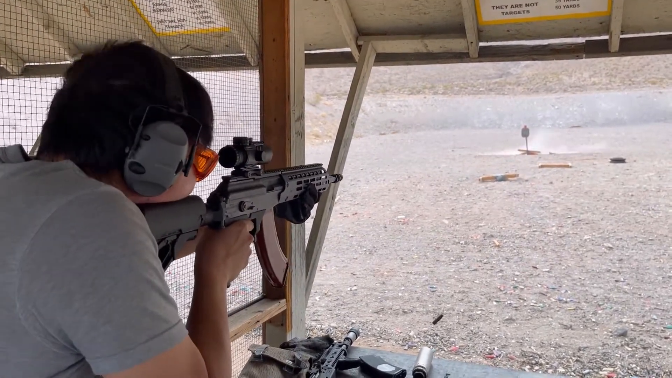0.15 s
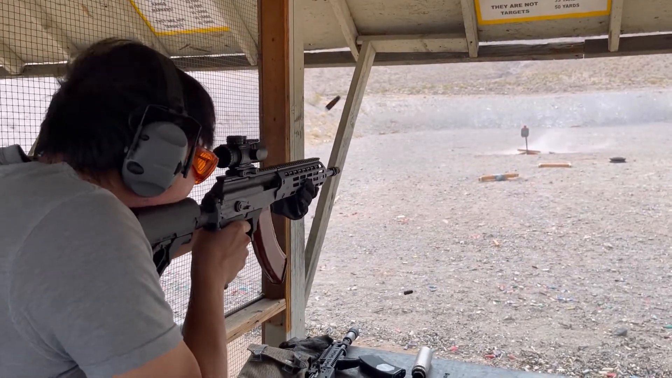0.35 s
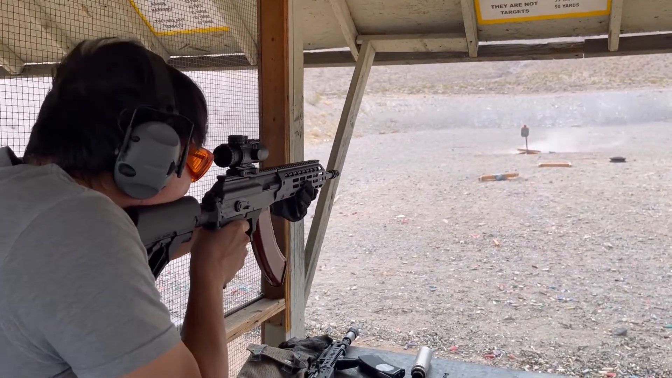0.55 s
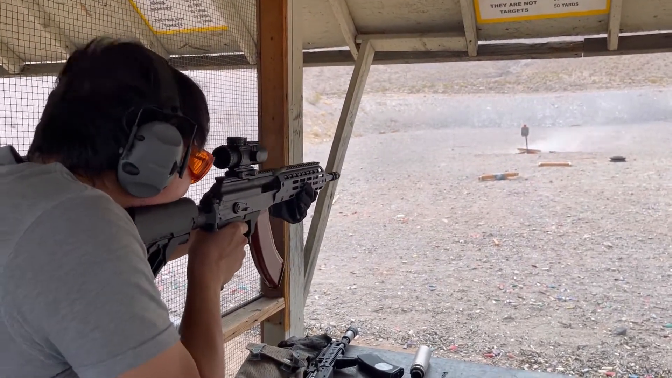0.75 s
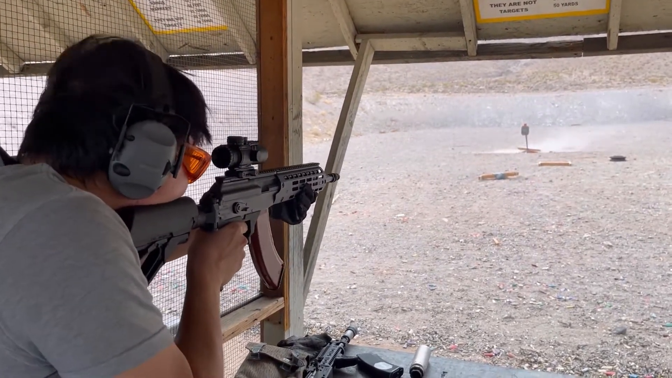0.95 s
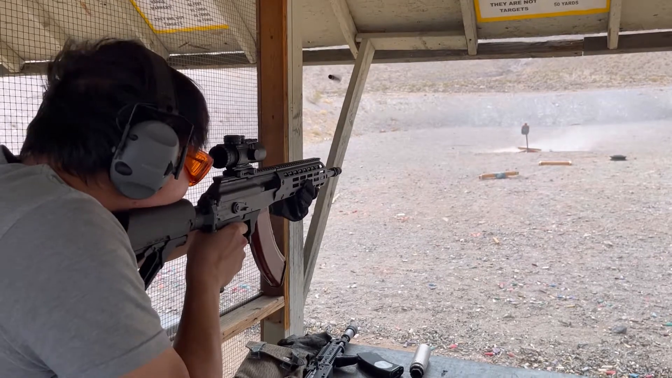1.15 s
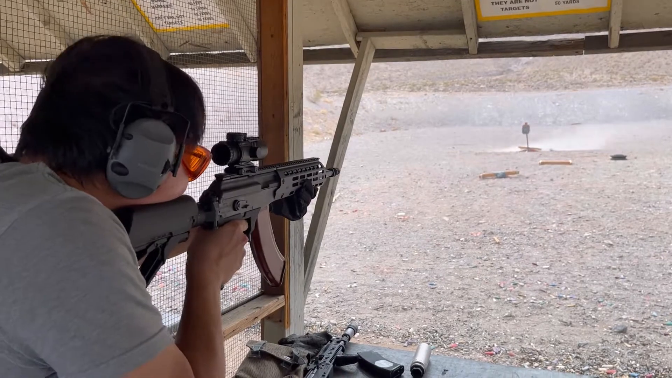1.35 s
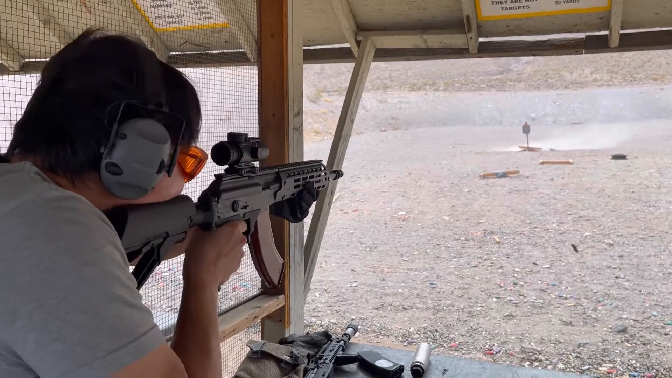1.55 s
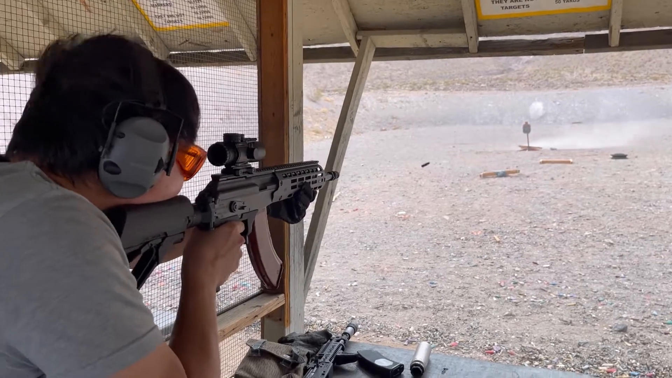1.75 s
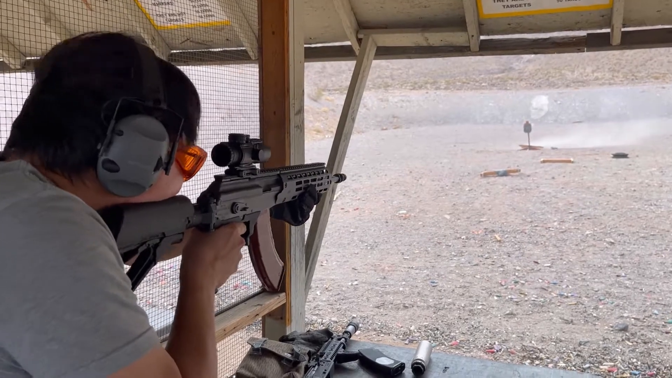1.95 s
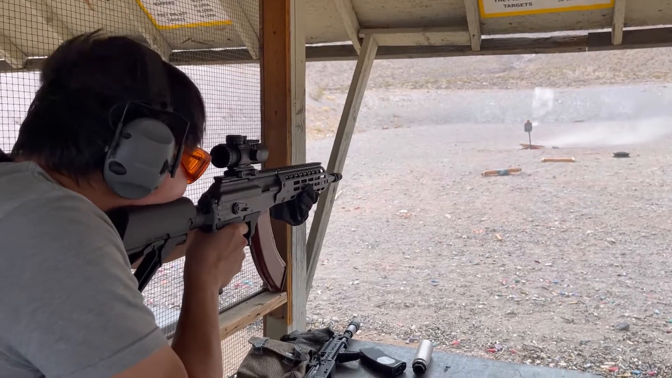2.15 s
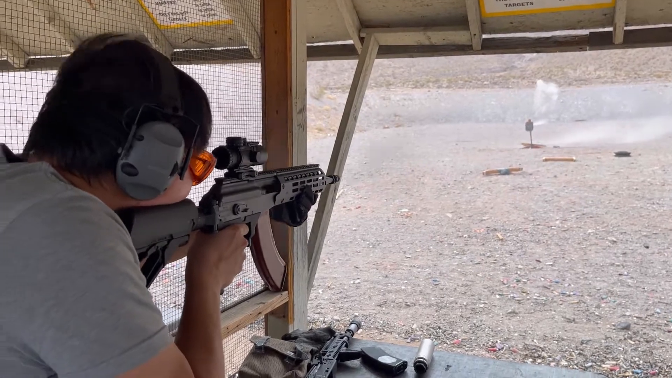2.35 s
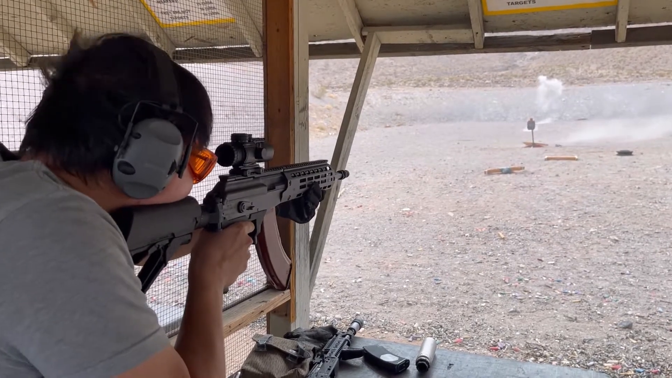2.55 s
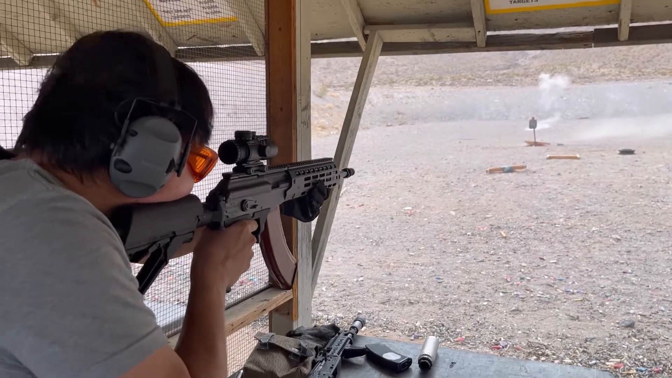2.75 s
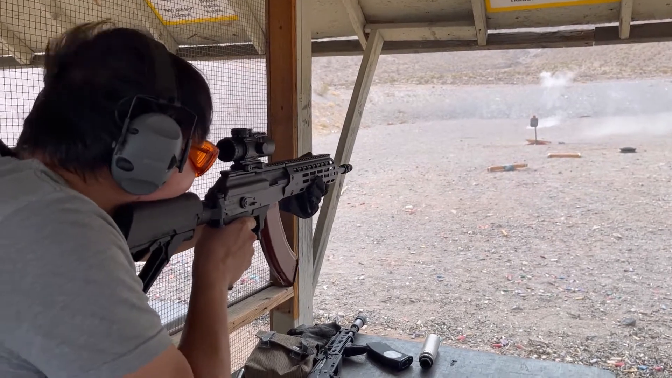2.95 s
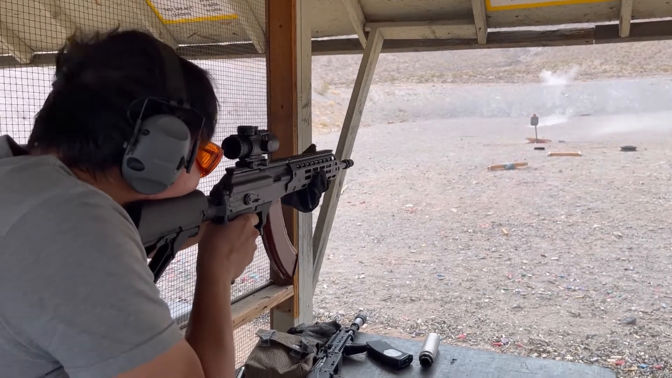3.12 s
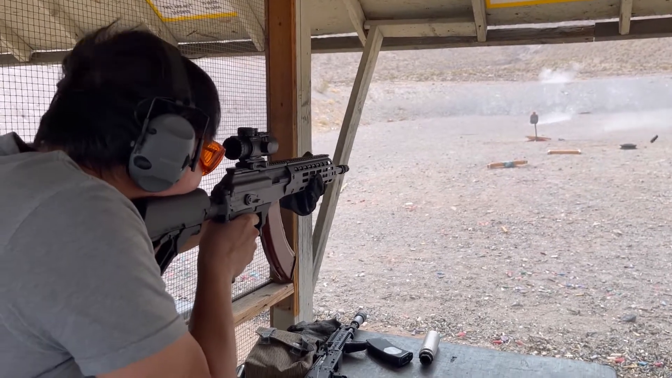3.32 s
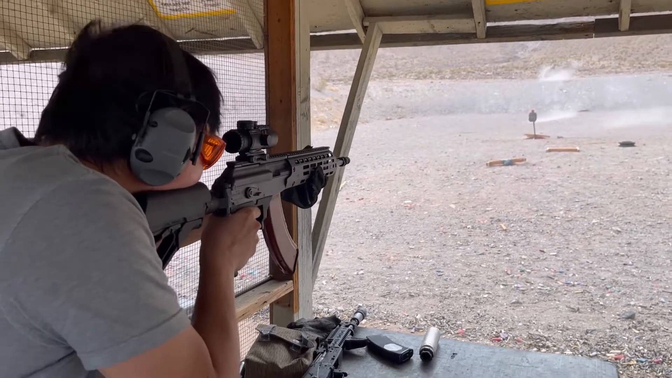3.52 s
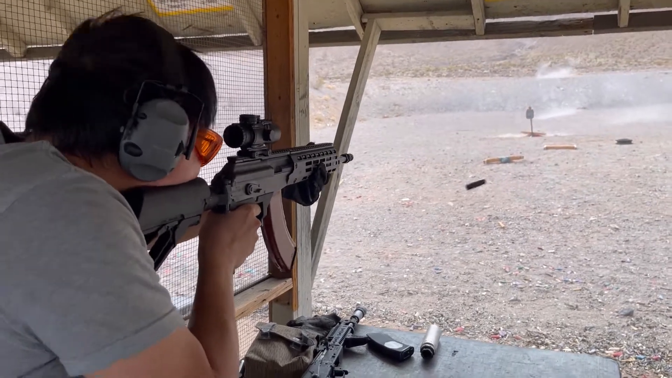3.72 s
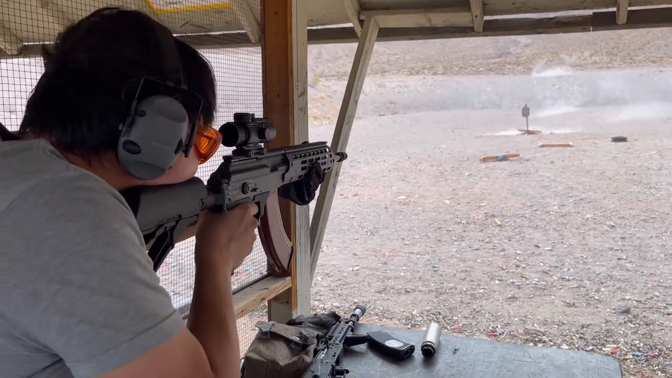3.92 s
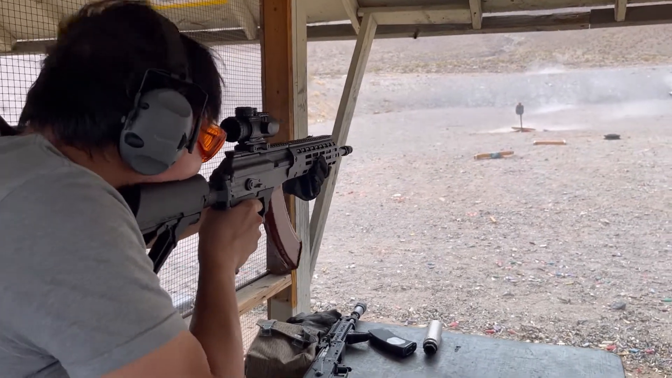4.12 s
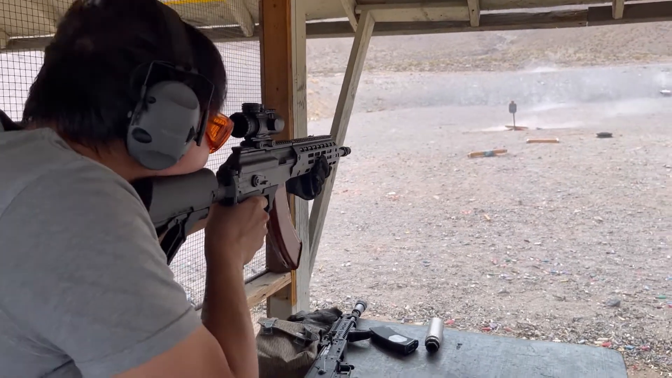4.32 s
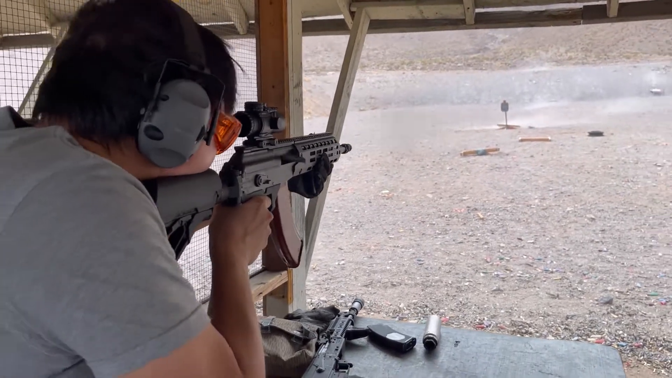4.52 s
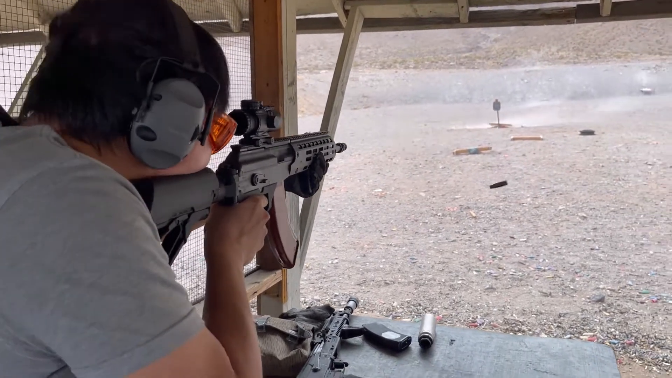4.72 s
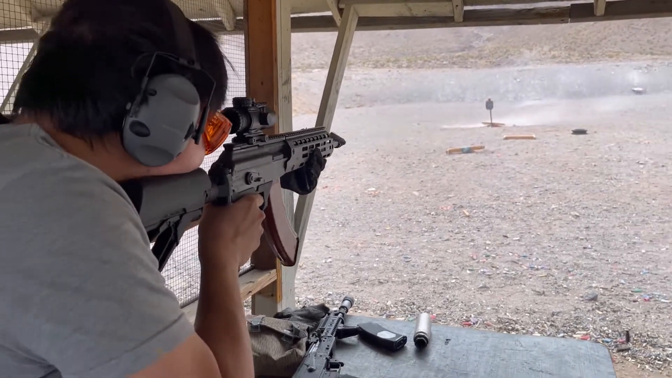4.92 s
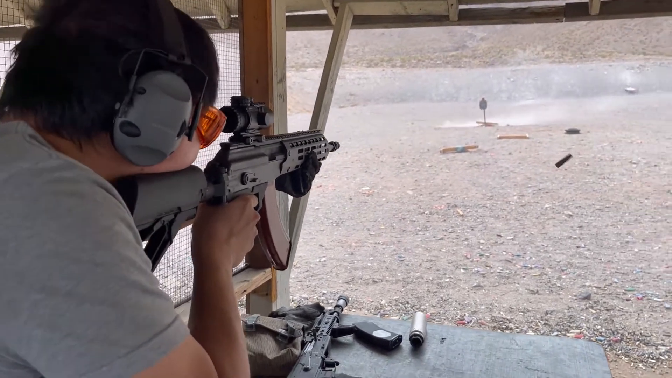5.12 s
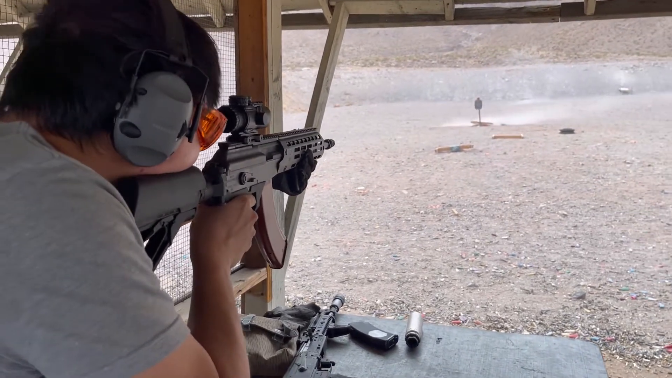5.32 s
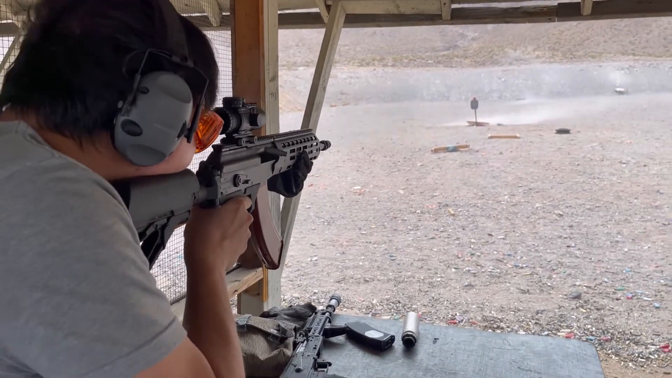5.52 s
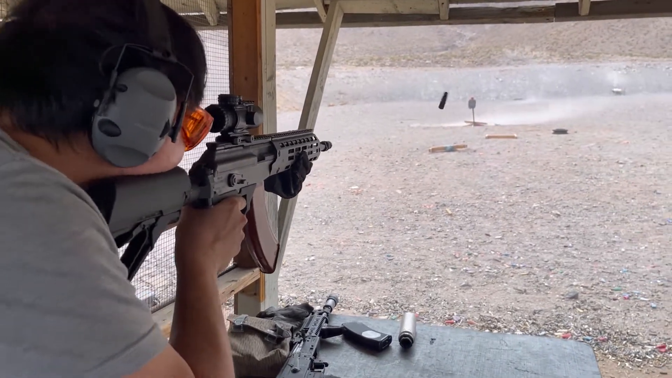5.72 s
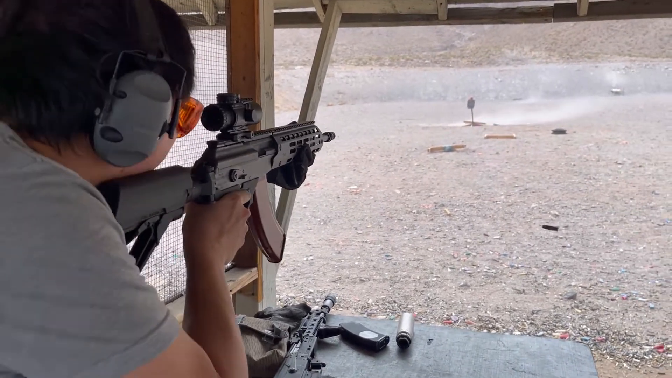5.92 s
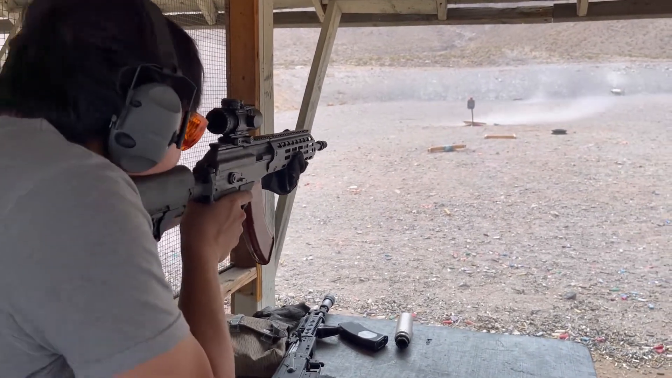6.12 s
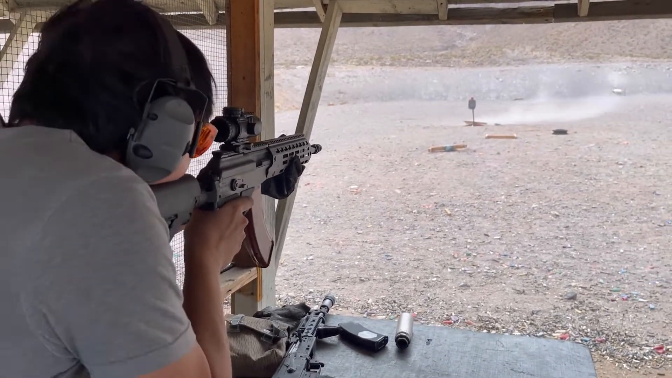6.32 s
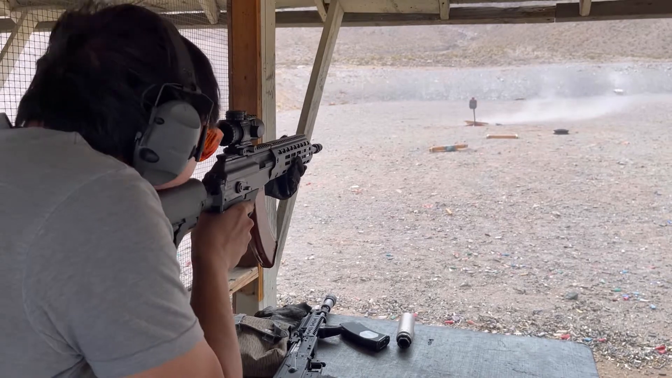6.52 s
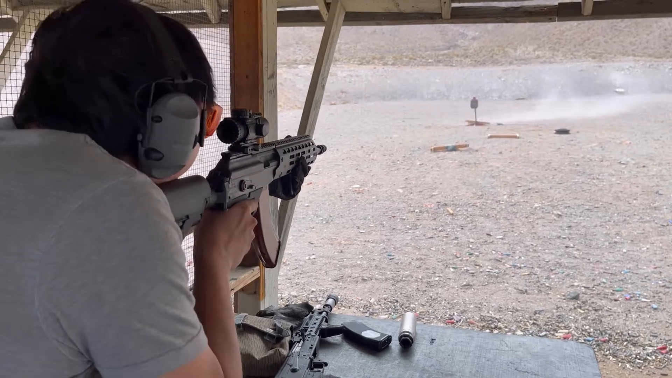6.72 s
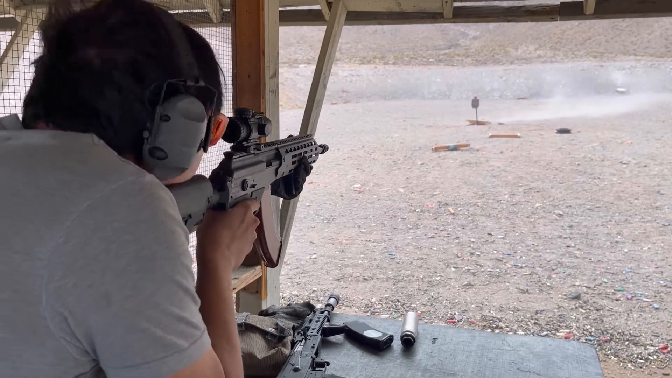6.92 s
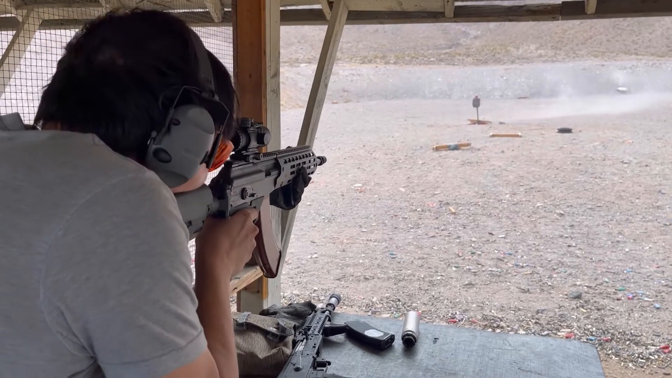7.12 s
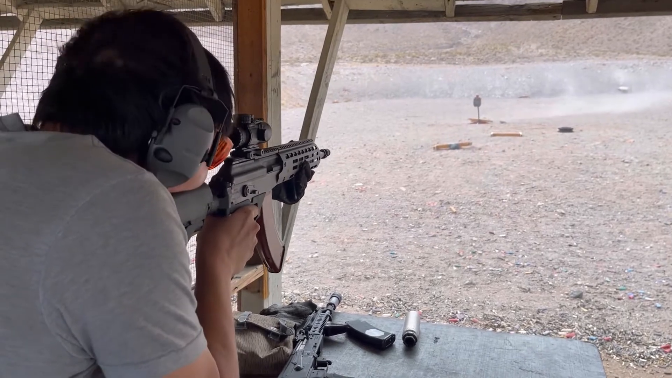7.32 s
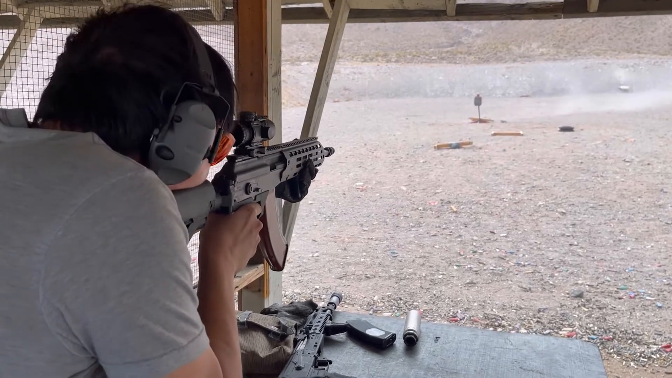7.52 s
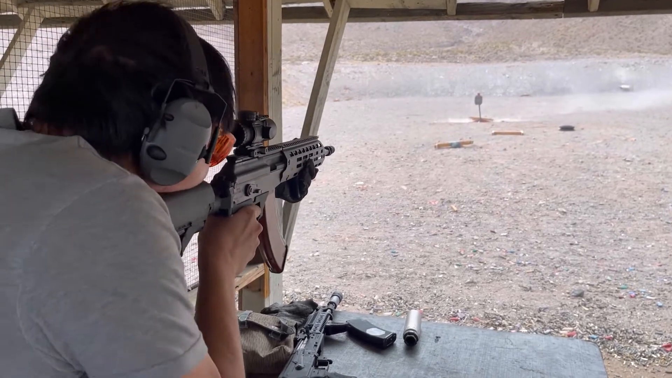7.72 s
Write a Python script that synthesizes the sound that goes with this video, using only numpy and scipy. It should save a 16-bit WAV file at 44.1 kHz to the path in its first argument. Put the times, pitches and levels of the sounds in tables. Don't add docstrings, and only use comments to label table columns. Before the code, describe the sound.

Close semi-automatic rifle shots boom in an open shelter, ejected casings ringing, then a windy pause with small ticks and one last shot.

```python
import sys
import numpy as np
from scipy import signal
from scipy.fft import rfft, irfft, next_fast_len
from scipy.io import wavfile
from scipy.ndimage import uniform_filter1d

SR = 44100
rng = np.random.default_rng(int(sys.argv[2]) if len(sys.argv) > 2 else 0)


def inscribe(sig):
    pcm = np.round(np.clip(np.atleast_2d(sig).T, -1, 1) * 32767)
    wavfile.write(sys.argv[1], SR, pcm.astype(np.int16))


def rack_gain(trim_db):
    fader = np.asarray(trim_db, float)
    return 10 ** (fader / 20)


N = 346626


def spectrum_axis(length):
    size = next_fast_len(length)
    return size, np.fft.rfftfreq(size, 1 / SR) + 1


def band(x, hz, octaves):
    size, f = spectrum_axis(x.shape[-1])
    bell = np.exp(-(np.log2(f / hz) / octaves) ** 4)
    return irfft(rfft(x, size) * bell, size)[..., :x.shape[-1]]


def slope(x, reach_hz, low_hz):
    size, f = spectrum_axis(x.shape[-1])
    shape = np.exp(-2 * np.sqrt(f / reach_hz)) / (1 + (low_hz / f) ** 3)
    return unit(irfft(rfft(x, size) * shape, size)[..., :x.shape[-1]])


def unit(x):
    return x / np.sqrt(np.mean(x ** 2))


def pair(size, likeness):
    mid, side = rng.standard_normal((2, size))
    c = np.clip(likeness, 0, 1)
    return np.sqrt((1 + c) / 2) * mid + np.sqrt((1 - c) / 2) * side * np.array([[1], [-1]])


def fade(t, t60):
    return np.exp(-np.log(1000) * t / t60)


def lean(db):
    return rack_gain(np.array([[db], [-db]]) / 2)


def walk(rate, size):
    hold = int(SR / rate)
    steps = rng.standard_normal(size // hold + 1)
    return 1.2 * uniform_filter1d(np.repeat(steps, hold), hold)[:size]


def start(length):
    return np.zeros((2, N)), np.arange(length) / SR


def add(out, s, sound):
    i = int(s * SR)
    a, b = max(i, 0), min(i + sound.shape[-1], N)
    out[:, a:b] += sound[..., a - i:b - i]


def hum():
    return rack_gain(-90 + 5 * walk(6.7, N)) * unit(band(pair(N, 0.26), 1330, .03))


# t/s, rumble level/dB, flutter over rumble/dB
WIND_STRENGTH = [(0, -47, -6), (.9, -38, -7.5), (1.9, -41, -7.5), (2.16, -31, -7.5), (2.45, -50, -7.5),
                 (3.04, -31, -9), (3.2, -38, -6), (3.5, -38, -8), (3.96, -45, -7), (4.5, -38, -6),
                 (4.9, -52, -7.5), (5.26, -40, -1), (5.86, -42, -9), (6.1, -33, -10), (6.6, -41, -6),
                 (6.67, -66, 4), (6.87, -54, -6), (7.4, -60, -9)]


def wind():
    t = np.arange(N) / SR
    s, rumble_points, over_points = np.transpose(WIND_STRENGTH)
    rumble_db = np.interp(t, s, rumble_points)
    flutter_db = np.interp(t, s, rumble_points + over_points)
    rasp_db = -60 + .6 * (flutter_db + 50)
    eddy, grain, puff = walk(45, N), walk(250, N), walk(14, N)

    rumble = unit(rack_gain(1.7 * eddy) * band(pair(N, 0.75), 84, 1.15))
    flutter = slope(rack_gain(3.0 * eddy + 3.0 * grain) * pair(N, 0.87), 60, 250)
    rasp = slope(rack_gain(4.0 * eddy + 4.0 * grain) * pair(N, .4), 130, 750)
    out = rack_gain(rumble_db + 1.5 * puff) * rumble
    out += rack_gain(flutter_db + 1.5 * puff) * flutter
    return out + rack_gain(rasp_db + 1.5 * puff) * rasp


# t/s, peak level/dB, length/ms, crackle level/dB
PORT_GUSTS = [(0.655, -29, 32, -20), (2.962, -27.5, 26, -16), (3.008, -30, 48, -19), (3.11, -38, 28, -24.5),
              (3.249, -36, 28, -19), (3.342, -29, 30, -17), (3.456, -31, 18, -29), (3.499, -39.5, 30, -15),
              (3.554, -41.5, 26, -23), (4.386, -30, 30, -20), (5.37, -36, 40, -20), (5.43, -37.5, 29, -24),
              (5.978, -36.5, 27, -22), (6.042, -31, 30, -21), (6.123, -32, 35, -26),
              (6.168, -32.5, 50, -21), (6.308, -38.5, 39, -23), (6.344, -35, 42, -15),
              (6.488, -27, 55, -26), (6.593, -36, 36, -24), (6.768, -44, 55, -14), (6.861, -43, 36, -17),
              (6.899, -42, 25, -8), (7.011, -44, 55, -12), (7.095, -45, 50, -15), (7.168, -45, 80, -14),
              (7.274, -42.5, 30, -14), (7.43, -48, 37, -13), (7.488, -46.5, 35, -18), (7.515, -47, 30, -14)]


def gusts():
    out, t = start(6144)
    lead_s = .04
    for s, db, ms, crackle_db in PORT_GUSTS:
        shape = np.sin(np.pi * np.clip((t - lead_s) * 1000 / ms, 0, 1) ** .55)
        push = shape * rack_gain(4.0 * walk(300, len(t))) * pair(len(t), .5)
        buffet = slope(push, 110, 300)
        crackle = rack_gain(crackle_db + .3) * lean(5) * slope(push, 160, 1070)
        share = np.sqrt(np.mean(shape ** 2))
        add(out, s - lead_s, share * rack_gain(db - 5) * (buffet + crackle))
    return out


# t/s, peak level/dB, left minus right/dB
GEAR_TICKS = [(3.1795, -46, 2), (3.3104, -56, 8), (5.3876, -52.5, 6), (6.0625, -40.5, 5), (6.093, -44.5, 1),
              (6.2432, -56.5, 2.5), (6.3544, -50, 5.0), (6.4333, -53.5, 3.5), (6.5011, -49, 10),
              (6.792, -56, 9.5), (6.905, -51.5, 11), (7.0115, -56, 11.0), (7.096, -56, 12.5),
              (7.1691, -59, 9), (7.2744, -57.5, 11)]


def gear():
    out, t = start(1024)
    shape = (1 - np.exp(-t / .0015)) ** 2 * fade(t, .018)
    for s, db, pan_db in GEAR_TICKS:
        tick = unit(band(pair(len(t), .3), 1700, 1.15))
        add(out, s - .001, rack_gain(db + 5) * lean(pan_db) * shape * tick)
    return out


# t/s, peak level/dB, length/ms
BANK_SLAPS = [(0.1994, -52, 12), (0.6137, -41.5, 15), (1.0291, -49, 16), (1.7943, -42.5, 18),
              (2.1024, -46, 18), (2.9583, -52.5, 15), (3.972, -46, 18), (4.3221, -50.5, 15),
              (5.1988, -39, 25), (5.8134, -64, 16), (6.2424, -57, 18), (6.6164, -64, 17)]


def bank():
    out, t = start(8192)
    for s, db, ms in BANK_SLAPS:
        smear = np.exp(-(t * 1000 / ms) ** 2)
        shape = np.minimum(t / .003, 1) * (smear + rack_gain(-8) * fade(t, 0.52))
        add(out, s, rack_gain(db - 6) * shape * unit(band(pair(len(t), .6), 7000, 1.9)))
    return out


CASE_MODE_HZ = (2067, 2794, 4269, 4748, 5103, 5809, 6008, 6465, 6901, 7467, 7978, 8721, 10030, 11370)
CASE_MODE_T60 = (.85, .33, .45, .25, .41, .6, .55, .2, .22, .33, .4, .2, .6, .17)
# t/s, level/dB
CASE_KNOCKS = [
    [(-.02, -37), (1.2, -31), (4.98, -32), (5.2, -62), (7.7, -39)],
    [(5.62, -37.5)],
    [(-.01, -40), (.84, -39), (5.0, -41)],
    [(1.22, -38), (5.6, -33), (7.7, -46.5)],
    [(-.01, -40)],
    [(1.22, -42), (4.61, -35), (4.97, -34), (5.61, -38)],
    [(-.01, -40), (.84, -43), (4.98, -30), (5.6, -36), (5.68, -44)],
    [(4.6, -27)],
    [(.845, -27)],
    [(.86, -46), (4.6, -39)],
    [(1.21, -42), (4.6, -41), (4.97, -38), (5.6, -45)],
    [(4.16, -36), (4.6, -34)],
    [(-.03, -27), (.84, -41), (1.21, -44), (4.6, -45), (4.95, -31), (5.62, -43)],
    [(4.15, -21), (4.6, -36), (4.97, -28), (5.6, -39)],
]


def cases():
    out, t = start(2 ** 14)
    swell = (1 - np.exp(-t / .018)) ** 2
    flight = np.exp(-(t / .19) ** 3) + rack_gain(-22)
    ear_turn = np.array([[0], [.2]])
    for hz, t60, knocks in zip(CASE_MODE_HZ, CASE_MODE_T60, CASE_KNOCKS):
        for s, db in knocks:
            turn, spin = rng.random(2)
            tumble_db = 3.1 * np.sin(2 * np.pi * (14 * t + spin + ear_turn))
            tumble = rack_gain(tumble_db + 2.2 * walk(60, len(t)))
            ring = np.sin(2 * np.pi * (hz * t + turn))
            add(out, s, rack_gain(db) * swell * fade(t, t60) * flight * tumble * ring)
    return out


JINGLE_MODE_HZ = (7250, 7900, 8350, 9250, 9700, 10500, 10800, 11050, 11700, 12150)
# t/s, peak level/dB, low knock level/dB
BOLT_SLAMS = [(0.0094, -31, -4), (0.4094, -32.5, -7), (0.833, -16.5, -19), (1.2077, -17.5, -3),
              (1.548, -31, -3), (1.9411, -29.5, 1.5), (2.4494, -37.5, -12), (2.7483, -27.5, 7),
              (3.7194, -24.5, -1.5), (4.1597, -18.5, -3.5), (4.6024, -18.5, -1.5), (4.9639, -15, -6.5),
              (5.5994, -20.5, 0.5), (7.6894, -18.5, -1.5)]


def bolt():
    out, t = start(8192)
    jingle_shape = np.minimum(t / .004, 1) * fade(t, .17)
    for s, db, low_db in BOLT_SLAMS:
        crack = unit(band(pair(len(t), 0.81), 8300, 0.8)) * fade(t, .04)
        knock = rack_gain(low_db) * unit(band(pair(len(t), .6), 1800, 1.3)) * fade(t, 0.066)
        size, detune, turn = rng.standard_normal((3, len(JINGLE_MODE_HZ), 1))
        hz = np.array(JINGLE_MODE_HZ)[:, None] * (1 + .006 * detune)
        parts = rack_gain(-18 + 4.2 * size) * np.sin(2 * np.pi * (hz * t + turn))
        jingle = np.sum(parts, axis=0) * jingle_shape
        add(out, s, rack_gain(db - 5) * (crack + rack_gain(2.5) * knock + jingle))
    return out


PANEL_MODE_HZ = (145, 156, 226, 365, 403, 459, 534, 748, 873, 1007, 1083)
# level/dB, t60/s, right lag/radians
PANEL_MODES = [(-16, .85, .6), (-18, .7, -.6), (-21, .8, 0.3), (-27, .8, .9), (-28, 0.63, .9),
               (-26.5, 0.65, -.7), (-21, .5, .7), (-20, .35, .7), (-28, 0.59, 0.8), (-27.5, 0.34, .7),
               (-25, 0.34, -.7)]


def panel_boom(t):
    swell = 1 - np.exp(-(t / .04) ** 2)
    peak_s = .062
    boom = 0
    for i, (hz, (db, t60, lag)) in enumerate(zip(PANEL_MODE_HZ, PANEL_MODES)):
        phase = (i - .5) ** 2 + np.array([[0], [lag]])
        boom = boom + rack_gain(db) * fade(t, t60) * np.cos(2 * np.pi * hz * (t - peak_s) - phase)
    return swell * boom


# f/Hz, level/dB, rise/ms, hold/ms, t60/s,
# late field level/dB, late t60/s, likeness/0-1, left minus right/dB
BLAST_BANDS = [
    (116, -12, 12, 52, 0.19, -28, .8, 0.5, 0.6),
    (244.7, -11.5, 14, 47, 0.23, -5.5, 1, 0.7, 1.5),
    (485, -7.5, 7.7, 68, 0.27, -7.5, 0.84, .6, 0.7),
    (938, -6.5, 8.5, 67.6, 0.28, -11, 0.8, 0.39, 1.5),
    (1856, -7, 6, 47, 0.25, -17, 0.85, 0.2, 1),
    (3900, -11.5, 5.4, 40, 0.21, -17, 0.78, 0.4, 5),
    (7000, -13.5, 2.3, 45, 0.22, -18.5, 0.72, 1, -2),
    (11200, -5, 6, 13, 0.23, -33, 0.55, 0.63, 8.64),
]


def blast(t):
    out = 0
    for hz, db, rise_ms, hold_ms, t60, late_db, late_t60, likeness, pan_db in BLAST_BANDS:
        rise = (1 - np.exp(-t * 1000 / rise_ms)) ** 2
        early = fade(np.maximum(t - hold_ms / 1000, 0), t60)
        end_db = -1 / (1 + (hz / 1500) ** 2)
        early = early * rack_gain(end_db / (1 + np.exp((.075 - t) / .004)))
        late = rack_gain(late_db) * fade(t, late_t60)
        noise = unit(band(pair(len(t), likeness), hz, 0.74))
        out = out + rack_gain(db) * lean(pan_db) * rise * (early + late) * noise
    return out * rack_gain(.8 * walk(40, len(t)) + 2.2 * walk(400, len(t)))


def cracks():
    out, t = start(2048)
    front = np.exp(-((t - .008) / .006) ** 2)
    for s, *_, crack_db in RIFLE_SHOTS:
        add(out, s - .004, rack_gain(crack_db - 3) * front * unit(band(pair(len(t), 1), 15000, .08)))
    return out


SHOT_BEFORE = (-0.08, -16, 0.4, -21.5, -50)
# t/s, peak level/dB, sameness with the other shots/0-1, thump level/dB, top crack level/dB
RIFLE_SHOTS = [(0.309, -10, 0.8, -17.5, -40.5), (0.734, -10, 0.6, -14.5, -40.5),
               (1.105, -10, 0.7, -16.5, -39), (1.452, -10, 0.6, -10, -58.5), (1.835, -10.5, 0.7, -10, -42),
               (2.349, -10.5, 0.47, -8.5, -45.5), (2.651, -10, 0.2, -12, -41),
               (3.623, -10.5, 0.6, -12.5, -74.5), (4.06, -10.5, 0.6, -16, -42.5),
               (4.503, -11, 0.6, -15, -40.5), (4.867, -11, 0.8, -11, -73.5), (5.5, -11, 0.77, -12, -43),
               (7.592, -12, 0.87, -16, -40)]


def rifle():
    out, t = start(24576)
    reach = np.cos(np.pi / 2 * (t / t[-1]) ** 3)
    shelter = blast(t)
    boom = rack_gain(13) * panel_boom(t)
    thump_shape = np.minimum(t / .025, 1) * fade(t, .5)
    for s, db, same, thump_db, _ in [SHOT_BEFORE, *RIFLE_SHOTS]:
        same = np.clip(same, 0, 1)
        answer = same * shelter + np.sqrt(1 - same ** 2) * blast(t)
        thump = rack_gain(thump_db) * thump_shape * unit(band(pair(len(t), .7), 65, .7))
        add(out, s - .006, rack_gain(db) * reach * (answer + boom + thump))
    return out


# f/Hz, level/dB
TOP_LOSS = [(11500, -2), (12500, -9.5), (13200, -23.5), (13600, -56.5)]


def scene():
    size, f = spectrum_axis(N)
    top_hz, top_db = np.transpose(TOP_LOSS)
    top = rack_gain(np.interp(np.log(f), np.log(top_hz), top_db))
    near = hum() + wind() + gusts() + gear() + bank() + cases() + bolt() + rifle()
    near = np.tanh(.8 * near) / .8
    hiss = rack_gain(-98) * pair(N, .3)
    return irfft(rfft(near, size) * top, size)[:, :N] + cracks() + hiss


def top_cut(x):
    return signal.sosfilt(signal.butter(12, 16950, fs=SR, output="sos"), x)


def record(dry):
    size, f = spectrum_axis(N)
    port_lag_s, treble_lead_s = .000022, .000294
    left, right = rfft(dry, size)
    share = 1 / (1 + (8200 / f) ** 16)
    own = (1 - share) * right * np.exp(-2j * np.pi * f * port_lag_s)
    shared = share * left * np.exp(2j * np.pi * f * treble_lead_s)
    mix = irfft(np.array([left, own - shared]), size)[:, :N]
    return top_cut(mix)


dry = scene()
out = record(dry)
inscribe(out)
```